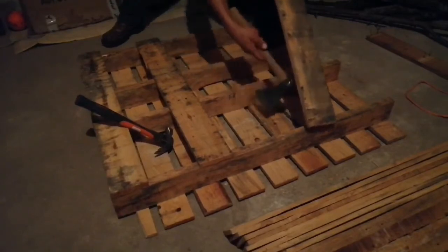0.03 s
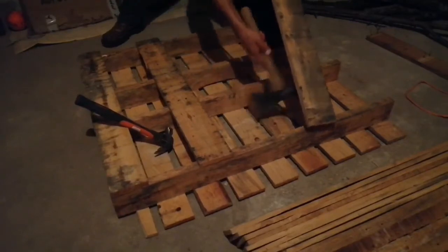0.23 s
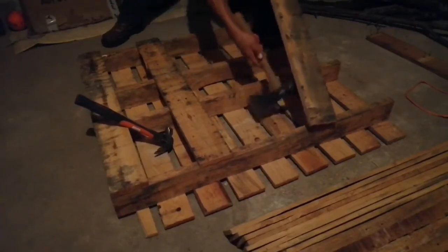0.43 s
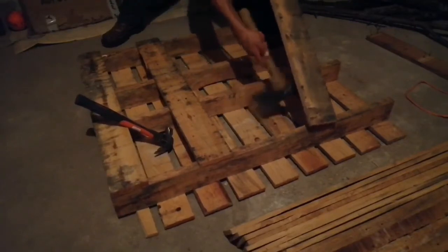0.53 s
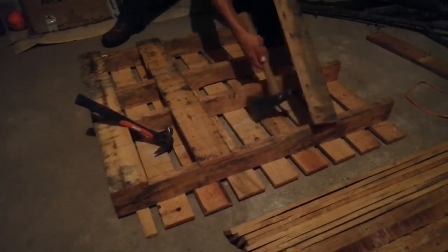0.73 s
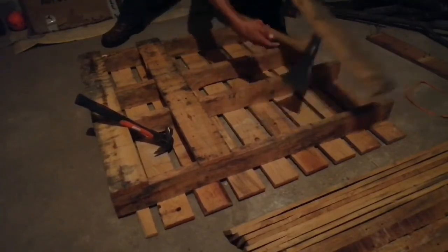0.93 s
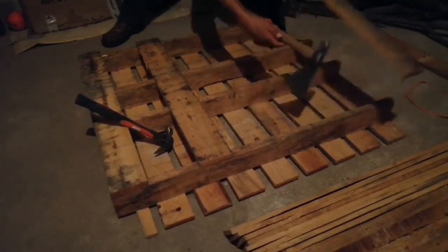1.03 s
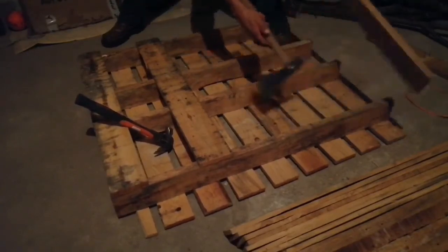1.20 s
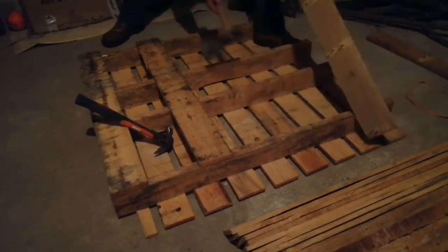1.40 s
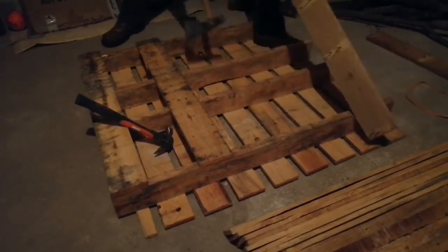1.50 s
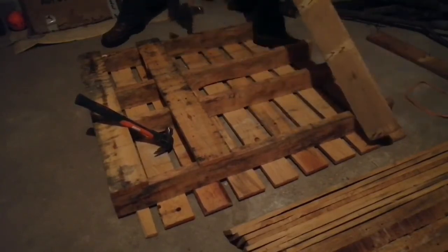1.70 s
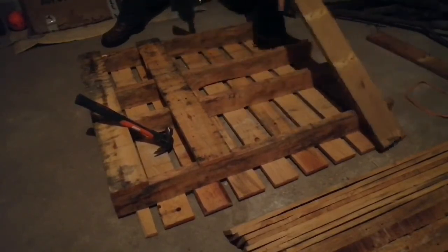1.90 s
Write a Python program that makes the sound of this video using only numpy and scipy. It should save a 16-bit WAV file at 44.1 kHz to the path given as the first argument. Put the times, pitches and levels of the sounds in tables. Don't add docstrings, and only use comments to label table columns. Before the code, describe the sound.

Four hard axe knocks on a wooden pallet in an echoing concrete workshop, then a board lands softly

```python
import sys
import numpy as np
from scipy import signal
from scipy.fft import rfft, irfft
from scipy.io import wavfile

SR = 44100
rng = np.random.default_rng(int(sys.argv[2]) if len(sys.argv) > 2 else 0)


def ratio(d):
    e = np.asarray(d, float) / 20
    return 10 ** e


def transcribe(u):
    v = np.clip(np.atleast_2d(u).T, -1, 1)
    q = np.round(v * 32767).astype(np.int16)
    wavfile.write(sys.argv[1], SR, q)


N = 85995
T = np.arange(N) / SR
HZ = np.maximum(np.fft.rfftfreq(N, 1 / SR), 1)
DELAY_S = 0.002

# (frequency [Hz], level [dB], t60 [s])
STEEL = [(4450, -5, 1.1), (4780, 1, .35), (4950, -3, .3), (5689, 0, .8)]
# (frequency [Hz], level [dB], t60 [s])
STEEL_TOP = [(8420, 0, .5), (9050, -2, .3), (10050, -9, .6)]
# (frequency [Hz], level [dB], t60 [s])
EDGE = [(14900, -3, .22), (15100, 0, .26), (13700, -8, .2), (12500, -10, .2)]


def blows(echo):
    # (time [s], peak [dB], left minus right [dB], ring [dB], echo [dB])
    impacts = [
        (0.209, -10, 1.5, -14.5, -9),
        (0.505, -14, -1.5, -6.5, -8.5),
        (0.801, -15, 1.5, -11.5, -10),
        (1.0762, -14.5, 2.5, -12, -8),
        (1.662, -21.5, 3.5, -9.5, -9.5),
    ]
    # (frequency [Hz], density [dB per Hz])
    colours = [
        [(35, -48), (60, -22.5), (280, -7.5), (480, 3.5), (749, -5.5), (1280, -14.5), (3000, -24),
         (3850, -29.5), (6140, -29), (14900, -70.5), (16000, -58)],
        [(35, -47.5), (60, -32), (153, -1), (715, -2), (803, -8), (1040, -6.5), (3850, -20), (4600, -15),
         (6300, -21), (8500, -51), (16000, -82.5)],
        [(35, -50), (70, -29.5), (400, -3), (579, -9), (1250, -14.5), (2090, -23.5), (5330, -23), (14900, -72),
         (16000, -83)],
        [(35, -75), (60, -31.5), (593, -2.5), (715, -9.5), (1140, -7), (1510, -24), (1700, -17), (3300, -21),
         (4100, -31), (5800, -27), (16000, -75.5)],
        [(35, -46.5), (60, -18), (190, 2.5), (420, 0), (882, -9.5), (3000, -27.5), (3940, -38), (6140, -27.5),
         (8510, -50.5), (14900, -55), (16000, -63)],
    ]
    # (frequency [Hz], level [dB], t60 [s])
    ring_1 = [(361, -10, .45), (463, 1, .38), (492, -2, .3), (646, 0, .5), (1066, -8, .36), (1276, -8, .36),
              (1599, -12, .3), (1744, -13, .26), (1927, -19, .28), (2256, -20, .3), (2719, -20, .26),
              (3187, -19, .28)]
    # (frequency [Hz], level [dB], t60 [s])
    ring_2 = [(455, 4.5, 0.14), (713.6, -5, 0.22), (905, -10, 0.44), (1037, -17, 0.57), (1210, -14, 0.28),
              (1620, -24, 1), (1796, -11, 0.54), (1990, -20, 0.61), (2286, -22.5, 0.23),
              (3400, -21.5, 0.28)]
    # (frequency [Hz], level [dB], t60 [s])
    ring_3 = [(361, -3, .3), (396, 1, .28), (466, -2, .36), (537, -4, .4), (657, -5, .4), (877, -6, .36),
              (1227, -9, .33), (1707, -8, .35), (2293, -14, .2), (2918, -17, .3)]
    # (frequency [Hz], level [dB], t60 [s])
    ring_4 = [(300, -11, .6), (398, 1, .45), (463, -7, .47), (721, -1, .62), (985, -11, .39),
              (1120, -1, .15), (1168, -3, .52), (1265, -9, .45), (1712, -14, .33), (2293, -13, .3),
              (2923, -7, .45), (3068, -14, .31), (3370, -6, .18)]
    # (frequency [Hz], level [dB], t60 [s])
    ring_5 = [(178, -3.5, 0.424), (281, -13, 0.3), (355, 1, 0.34), (398, -1.5, 0.47), (506, -5, 0.25),
              (628, -6.5, 0.18), (680, -5.5, 0.22), (887, -3.5, 0.36), (1020, -18, 0.43), (1210, -6, 0.14),
              (1260, -10, .29), (2000, -17, 0.13), (3260, -18.5, 0.26)]
    # (frequency [Hz], level [dB], t60 [s])
    frame = [(130.2, -17.5, 0.83), (137.9, -20.5, 0.61), (198, -27.5, 0.65), (211, -10.5, 0.21),
             (491, -4, 0.53)]
    # (frequency [Hz], level [dB], t60 [s])
    thumps = [(475, -25.5, 0.069), (455, -26, 0.067), (416, -22, 0.11), (424, -27.5, 0.051),
              (384, -16, 0.0336)]
    frame_levels = [-3.5, -2.5, -2.5, -2, -7.5]
    steel_levels = [-70, -70, -65, -63, -110]
    top_levels = [-72.5, -68, -67, -71.5, -88]
    crack_levels = [-26, -23.5, -23, -25.5, -46]
    wavers = [.5, .9, .8, .55, .8]
    lead_s, crack_lag_s, swell_s = 0.001, 0.0009, 0.002
    thud_db, thud_s = 5, 0.018
    contact = ratio(thud_db * np.exp(-(T[:N // 3] / thud_s) ** 4))
    rings = [ring_1, ring_2, ring_3, ring_4, ring_5]
    out = 0
    for i, (s, db, pan_db, ring_db, echo_db) in enumerate(impacts):
        sides = ratio(np.array([[pan_db], [-pan_db]]) / 2)
        wood = place(3.8 * knock(colours[i], echo, echo_db, chatter_db=-14.5), s)
        boards = ring(rings[i], swell_s, rough=wavers[i])
        boards = boards + ratio(frame_levels[i]) * ring(frame, swell_s)
        wood = wood + ratio(ring_db) * 0.53 * place(boards * contact, s - lead_s)
        thump = ring([thumps[i]], 0.0015, rough=0)
        split = ratio(crack_levels[i]) * place(crack(echo), s + crack_lag_s)
        steel = ratio(steel_levels[i]) * ring(STEEL, 0.02, 0.004, 0.5)
        steel = steel + ratio(top_levels[i]) * ring(STEEL_TOP[1:] + EDGE[1:], 0.002, 0.0055, 0.9)
        out = out + sides * (ratio(db) * wood + split - place(thump, s - lead_s)) + place(steel, s)
    return out


def knock(colour, echo, echo_db, chatter_db):
    rattle_s = 0.014
    t = T[:4096]
    push = ratio(chatter_db) * 0.17 * rng.standard_normal(len(t)) ** 3 * np.exp(-t / rattle_s)
    push[0] = 1
    return add_echo(signal.fftconvolve(push, body(colour))[None], echo, 5 * ratio(echo_db))


def crack(echo):
    # (frequency [Hz], density [dB per Hz])
    colour = [(2000, -8), (3200, 1.5), (4500, 2), (5500, 5), (6500, 2), (8000, -21), (11000, -30),
              (15000, -24), (16500, -47.5)]
    fall_s, echo_db = 0.0019, -7
    t = T[:2048]
    burst = rng.standard_normal((2, len(t))) * np.exp(-t / fall_s)
    return add_echo(signal.fftconvolve(burst, body(colour)[None], axes=1), echo, ratio(echo_db))


def ring(modes, swell_s, spread=0.03, rough=0.85):
    t, out = T[:N // 3], 0
    knots = rng.standard_normal((len(modes), 6, 160))
    knots[:, :2, 0] = 0
    for (hz, db, t60_s), mode_knots in zip(modes, knots):
        at = np.minimum(t * max(hz * spread, 12), 159)
        w = np.array([np.interp(at, np.arange(160), k) for k in mode_knots])
        common = w[0] + 1j * w[1]
        apart = min(hz / 1200, 1) * (w[2:4] + 1j * w[4:])
        waver = 1 + rough * (common + apart)
        out = out + ratio(db - 60 * t / t60_s) * np.imag(waver * np.exp(2j * np.pi * hz * t))
    return out * (1 - np.exp(-t / swell_s))


def ticks(echo):
    # (time [s], steel [dB], upper steel [dB], wood [dB], scrape [dB])
    touches = [
        (0.123, -64.5, -58, -48, -75.5),
        (0.402, -80, -73, -43.5, -55),
        (.728, -79, -66.5, -47.5, -55),
    ]
    edge_levels = [-85, -71, -63]
    # (frequency [Hz], density [dB per Hz])
    tap_colour = [(35, -44.5), (60, -30.5), (144, 2), (245, -30.5), (494, -7), (852, -35.5), (4000, -36),
                  (5200, -84), (8800, -120)]
    # (frequency [Hz], density [dB per Hz])
    scrape_colour = [(590, -44), (1000, 2), (1810, -8.5), (3800, -11), (5700, -9.5), (10400, -29.5),
                     (15500, -37), (16000, -38)]
    out = 0
    for (s, steel_db, top_db, wood_db, scrape_db), edge_db in zip(touches, edge_levels):
        steel = ratio(steel_db) * ring(STEEL, 0.0011, 0.012, 0.7)
        steel = steel + ratio(top_db) * ring(STEEL_TOP, 0.0015, 0.003, 0.2)
        steel = steel + ratio(edge_db) * ring(EDGE, 0.0066, 0.003, 0.8)
        tap = ratio(wood_db) * brush(tap_colour, echo, rise_s=0.0018, fall_s=0.0062, echo_db=4.4)
        scrape = ratio(scrape_db) * brush(scrape_colour, echo, rise_s=0.0014, fall_s=0.0012, echo_db=16.5)
        for part in (steel, tap, scrape):
            out = out + place(part, s - DELAY_S)
    return out


def brush(colour, echo, rise_s, fall_s, echo_db):
    t = T[:8192]
    swell = (1 - np.exp(-t / rise_s)) * np.exp(-t / fall_s)
    grains = unit(rng.standard_normal(len(t)) * swell)
    return 20 * add_echo(signal.fftconvolve(grains, body(colour))[None], echo, ratio(echo_db))


def touch_down(echo):
    # (frequency [Hz], level [dB], t60 [s])
    modes = [(1200, 2, .15), (1750, -3, .12), (2800, -1, .12)]
    start_s, ring_db, grit_db = 1.637, -64, -84
    tap = ratio(ring_db) * place(ring(modes, 0.0017, 0.011, 0.36), start_s)
    return tap + grit(echo, start_s, grit_db, echo_db=-25, chatter_db=7.5)


def settling(echo):
    # (time [s], level [dB])
    grains = [
        (.005, -87.5),
        (.015, -88),
        (.046, -87),
        (.069, -90),
        (.1, -88),
        (.11, -94),
        (1.772, -77),
        (1.815, -83.5),
        (1.928, -90),
    ]
    return sum(grit(echo, s, db, echo_db=-28.5, chatter_db=0.95) for s, db in grains)


def grit(echo, start_s, db, echo_db, chatter_db):
    # (frequency [Hz], density [dB per Hz])
    colour = [(3000, -4), (4500, -4), (6200, 1.5), (7500, -2), (10000, -28.5)]
    return 8 * ratio(db) * place(knock(colour, echo, echo_db, chatter_db), start_s)


def room():
    # (frequency [Hz], t60 [s])
    decay = [(60, 1), (250, 0.46), (700, 0.49), (1800, 0.47), (5000, 0.33), (9000, 0.33), (15000, 0.41)]
    build_s, early_s, early_db = 0.00067, 0.0039, 5
    wall_s, wall_db = 0.0029, -21.5
    noise, out = stereo_noise(), 0
    for hz in 45 * 2 ** np.arange(0, 9, 0.5):
        weight = np.clip(1 - 2 * np.abs(np.log2(HZ / hz)), 0, 1)
        out = out + irfft(noise * weight, N) * ratio(-60 * T / table(decay, hz))
    out = out * (1 - np.exp(-T / build_s))
    out = out * (1 + ratio(early_db) * np.exp(-T / early_s))
    wall = ratio(wall_db) * 10 * np.exp(-((T - wall_s) * SR / 2) ** 2)
    return unit(out + wall)[:, :N // 2]


def add_echo(direct, echo, gain):
    wet = signal.fftconvolve(direct, echo, axes=1) * gain
    wet[:, :direct.shape[1]] += direct
    return wet


def place(x, start_s):
    k = int((start_s + DELAY_S) * SR)
    return np.array([np.pad(v, (k + 2 * side, N))[:N] for side, v in enumerate(x)])


def floor():
    # (frequency [Hz], density [dB per Hz])
    colour = [(15, -40.5), (25, -23), (59, -1), (97, -29), (175, -17), (560, -26), (840, -31.5),
              (6050, -41.5), (9000, -50), (16000, -44.5)]
    level_db = -68
    x = irfft(stereo_noise() * ratio(table(colour)), N)
    return x * ratio(level_db) / np.std(x.mean(axis=0))


def stereo_noise():
    # (frequency [Hz], side minus mid [dB])
    width = [(60, -10), (110, -12), (200, -11), (380, -8), (700, -4), (1290, -1), (2380, 0), (4400, 0),
             (8120, 0), (15000, 0)]
    mid, side = rfft(rng.standard_normal((2, N)))
    side = side * ratio(table(width))
    return np.array([mid + side, mid - side])


def body(points, size=2048):
    hz = np.maximum(np.fft.rfftfreq(size, 1 / SR), 1)
    c = irfft(table(points, hz) * np.log(10) / 20)
    c[1:size // 2] *= 2
    c[size // 2 + 1:] = 0
    return unit(irfft(np.exp(rfft(c))))


def table(points, hz=HZ):
    p = np.array(points, float)
    return np.interp(np.log(hz), np.log(p[:, 0]), p[:, 1])


def unit(x):
    return x / np.sqrt(np.sum(x ** 2))


def scene():
    echo = room()
    return blows(echo) + ticks(echo) + touch_down(echo) + settling(echo) + floor()


def top_cut(x):
    return signal.sosfilt(signal.butter(12, 16520, fs=SR, output="sos"), x)


def record(dry):
    # (frequency [Hz], gain [dB])
    mic = [(2800, -1.5), (4000, -4.5), (5500, 2), (12000, 1), (13500, 2), (15000, 0.5), (15800, -0.5),
           (16200, -25)]
    # (frequency [Hz], left minus right [dB])
    lean = [(1200, 1), (2500, 0), (5500, 7), (8000, 1.5), (13000, -0.5)]
    lean_db = table(lean)
    gain_db = np.array([lean_db, -lean_db]) / 2 + table(mic)
    return top_cut(irfft(rfft(dry) * ratio(gain_db), N))


dry = scene()
out = record(dry)
transcribe(out)
```